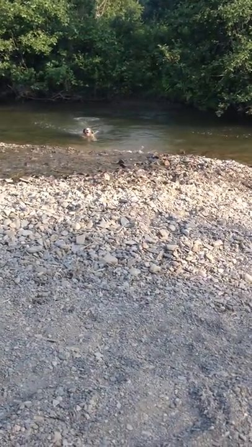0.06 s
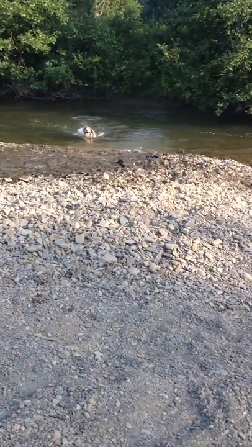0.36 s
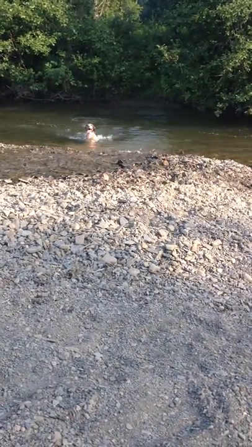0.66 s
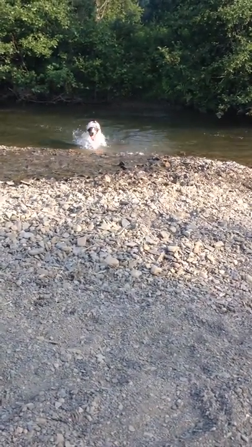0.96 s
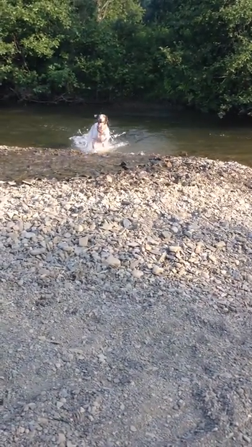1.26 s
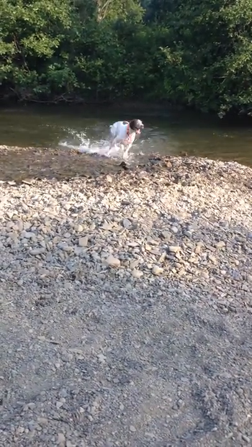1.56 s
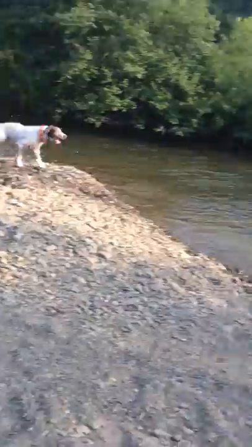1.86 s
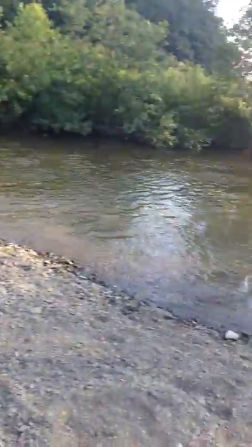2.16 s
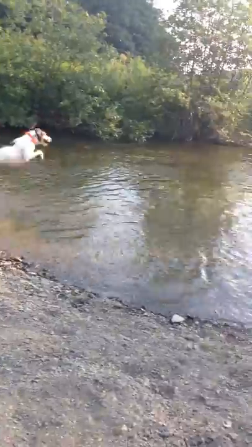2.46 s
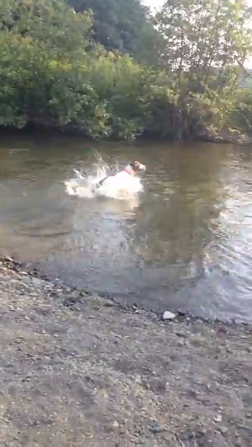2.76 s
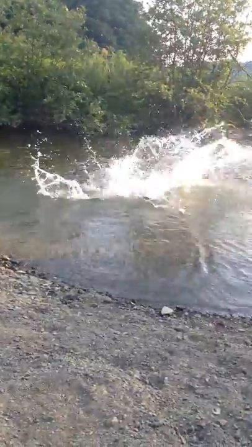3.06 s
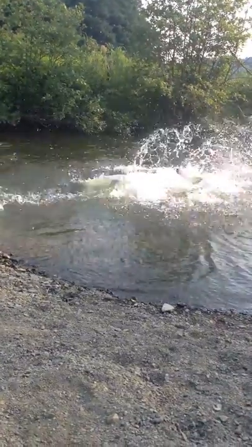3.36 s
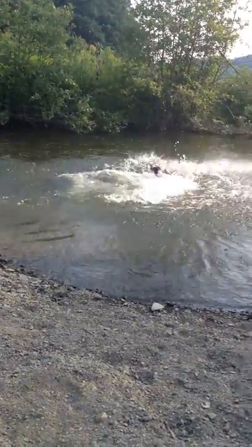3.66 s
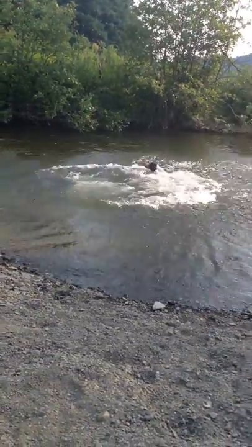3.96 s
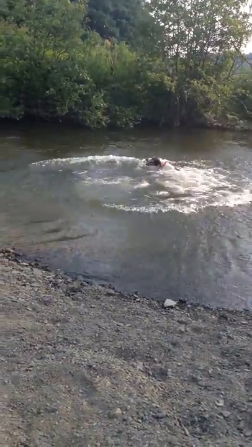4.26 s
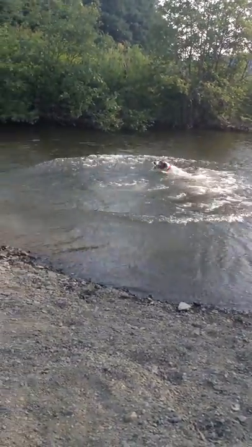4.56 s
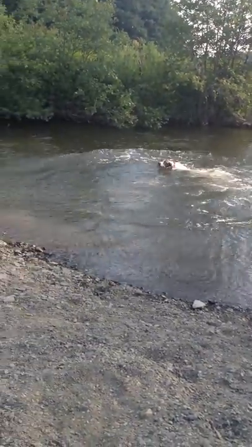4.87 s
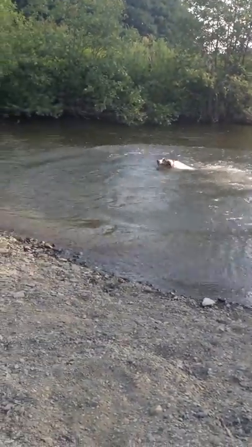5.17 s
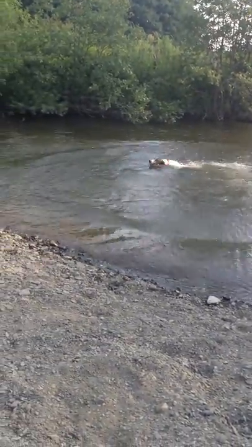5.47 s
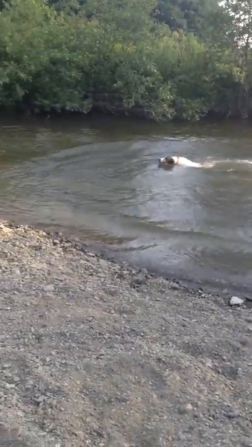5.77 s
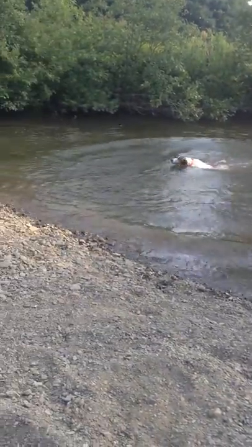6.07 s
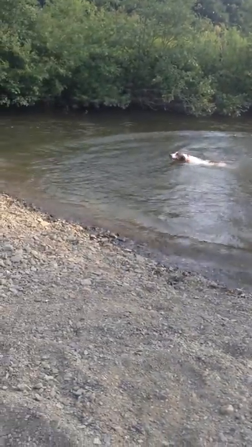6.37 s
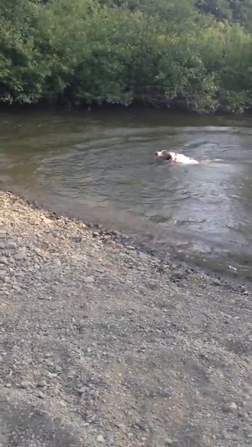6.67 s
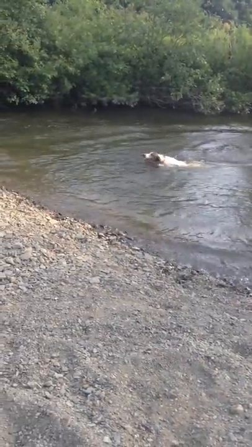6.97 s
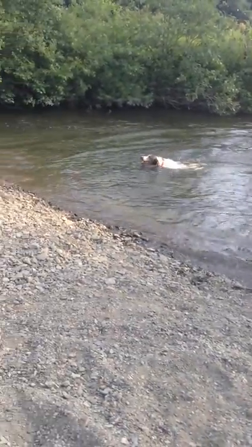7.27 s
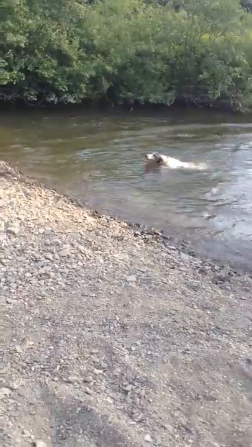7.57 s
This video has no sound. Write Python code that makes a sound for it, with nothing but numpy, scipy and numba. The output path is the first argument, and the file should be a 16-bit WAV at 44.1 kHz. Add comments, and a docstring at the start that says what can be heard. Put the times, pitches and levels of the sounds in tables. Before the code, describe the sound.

A dog splashes out of a flowing creek, gallops over pebbles and leaps back in with a big splash, then small waves lap.

```python
"""A creek washes on throughout. Wind nudges the microphone and a small bird calls as a dog wades out,
churning up bubbles, its coat dripping. It gallops over a gravel bar: paws slap, pebbles knock.
At 2.7 s it leaps back in: a smack, deep gulps from the collapsing air cavity, then spray raining down.
It paddles off through fading foam. From 5 s its waves lap the shore and hiss back through the shingle,
among a few more knocks, bird notes and faint puffs of wind."""
import sys
import numpy as np
from scipy import signal
from scipy.fft import rfft, irfft, next_fast_len
from scipy.io import wavfile
from numba import njit

SR = 44100
rng = np.random.default_rng(int(sys.argv[2]) if len(sys.argv) > 2 else 0)


def wrap_up_sound(samples):
    """Save the sound to the file named by the first command line argument, as 16-bit audio."""
    columns = np.atleast_2d(samples).T
    # keep every value between -1 and 1, then stretch to whole-number steps
    tamed = np.clip(columns, -1, 1)
    steps = np.round(tamed * 32767).astype(np.int16)
    wavfile.write(sys.argv[1], SR, steps)


N = 345303
T = np.arange(N) / SR


def undb(db):
    """Decibels to gain."""
    return 10 ** (np.asarray(db) / 20)


def unit(x):
    """Scale to rms 1."""
    return x / np.sqrt(np.mean(x ** 2))


def colour(x, points):
    """Filter by a curve of (Hz, dB) points, then scale to rms 1."""
    hz, db = np.transpose(points)
    size = next_fast_len(N)
    bin_hz = np.maximum(np.fft.rfftfreq(size, 1 / SR), 1)
    response = undb(np.interp(np.log(bin_hz), np.log(hz), db))
    return unit(irfft(rfft(x, size) * response, size)[:N])


def highpass(x, hz):
    """Second-order bass cut."""
    return signal.sosfilt(signal.butter(2, hz, "high", fs=SR, output="sos"), x)


def wander(rate_hz):
    """Random curve, spread near 1; holds after 1024 steps."""
    steps = rng.standard_normal(1024)
    return np.interp(T * rate_hz, np.arange(len(steps)), steps)


def decay(t, t60_s):
    """Gain falling 60 dB in t60_s."""
    return np.exp(-np.log(1000) * t / t60_s)


def swell(start_s, attack_s, hold_s, t60_s):
    """Gain that rises, holds, then dies away."""
    age = T - start_s
    fade_db = -60 * np.clip((age - attack_s - hold_s) / t60_s, 0, 2)
    return np.clip(age / attack_s, 0, 1) * undb(fade_db)


def bump(centre_s, half_width_s):
    """Bell-shaped gain."""
    return np.exp(-((T - centre_s) / half_width_s) ** 2)


def power_sum(*gains):
    """Joint gain of unrelated sounds."""
    return np.sqrt(sum(g ** 2 for g in gains))


def add(out, start_s, sound):
    """Mix a short sound into out."""
    i = max(int(start_s * SR), 0)
    out[i:i + len(sound)] += sound[:N - i]


@njit
def ring(starts, hz, cycles, size, glide):
    """Sum of decaying sines, each rising in pitch by the fraction glide as it dies."""
    out = np.zeros(N)
    for k in range(len(starts)):
        n = int(cycles[k] * SR / hz[k]) + 2
        phase, gain, fade = 0., size[k], np.exp(-5.5 / n)
        for i in range(min(n, N - starts[k])):
            phase += 2 * np.pi * hz[k] / SR * (1 + glide * i / n)
            out[starts[k] + i] += gain * np.sin(phase)
            gain *= fade
    return out


def bubbles(count, low_hz, high_hz, cycles, spread_db, glide):
    """Bubbles of random strength ring at random moments; flat spectrum between the two pitches."""
    when, pitch, life, luck = rng.random((count, 4)).T
    hz = low_hz * (high_hz / low_hz) ** pitch
    size = hz * undb(-spread_db * np.log(np.maximum(luck, .01)))
    return unit(ring((when * N).astype(np.int64), hz, cycles * (.5 + life), size, glide))


def drops(count, spread_db):
    """Sharp ticks of drops striking the surface."""
    when, sign, luck = rng.random((count, 3)).T
    size = np.sign(sign - .5) * undb(-spread_db * np.log(np.maximum(luck, .003)))
    return unit(np.bincount((when * N).astype(int), size, N))


# Flowing water. Each row: frequency in Hz, relative level in dB.
CREEK_SPECTRUM = [(24, -57), (40, -23), (103, -7.5), (173, -2.5), (239, 0), (364, -2.5), (466, -11.5),
                  (582, -2.5), (824, -0.5), (888, -2), (1170, 0), (1260, 0), (1780, -3), (3140, -10),
                  (15000, -13)]
# Drops on water, also for the dog's spray. Each row: frequency in Hz, relative level in dB.
DROP_SPECTRUM = [(900, -35), (2000, -2.5), (3300, -3), (5000, -2), (8000, -2), (11000, -1.5), (15000, 0)]


def creek(wash_db=-49, tick_db=-65):
    """A smooth distant wash, with near ripples that gurgle, fizz and tick."""
    gurgle = bubbles(count=3600, low_hz=285, high_hz=1966, cycles=26, spread_db=2.5, glide=0.22)
    fizz = bubbles(count=5000, low_hz=2500, high_hz=14550, cycles=25, spread_db=3, glide=0.14)
    wash = rng.standard_normal(N)
    ripple_db = np.clip(4.8 * wander(8), -5, 4)
    flow = wash + undb(-12 + ripple_db) * gurgle + undb(-3.5) * fizz
    ticks = undb(tick_db) * colour(drops(count=260, spread_db=-1), DROP_SPECTRUM)
    return colour(flow, CREEK_SPECTRUM) * undb(wash_db + .5 * wander(2.37)) + ticks


# Wind eddies. Each row: centre in seconds, level in dB, half width in seconds.
EDDIES = [(0.019, -38.5, 0.028), (0.111, -36.5, 0.011), (.305, -39.5, 0.05), (.468, -32, 0.023),
          (0.616, -27.5, 0.014), (0.651, -27.5, 0.021), (.745, -38, 0.065), (1.24, -39, 0.065),
          (1.305, -36, 0.035), (1.4, -39, 0.014), (1.67, -46, 0.056), (1.81, -43.5, 0.018),
          (2.235, -40.5, .014), (4.34, -60, 0.027), (5.82, -53, .025), (6.02, -54, 0.02),
          (6.67, -57, 0.022), (7.49, -50.5, .025), (7.61, -60, 0.028)]
# Microphone buffeting. Each row: frequency in Hz, relative level in dB.
WIND_SPECTRUM = [(25, -30), (55, -19), (90, -9), (140, 4), (230, -1), (310, -7), (430, -22.5), (900, -26.5),
                 (3000, -65)]


def wind(breeze_db=-47.5):
    """Eddies thump softly on the microphone port, the early ones over a light breeze."""
    eddies = [undb(db) * bump(centre_s, half_width_s) for centre_s, db, half_width_s in EDDIES]
    breeze = undb(breeze_db + 3.6 * wander(22)) * swell(0.55, attack_s=0.1, hold_s=1.03, t60_s=1.9)
    rumble = colour(rng.standard_normal(N), WIND_SPECTRUM)
    return rumble * power_sum(breeze, *eddies) * undb(0.32 * wander(40))


def bushes(x, t60_s=0.27):
    """Bushes on the far bank scatter a sound into a short, soft tail."""
    t = T[:SR // 3]
    leaves = rng.standard_normal(len(t)) * decay(t, t60_s)
    return signal.fftconvolve(x, leaves / np.linalg.norm(leaves))[:N]


# Bird notes. Each row: start and length in seconds, level in dB, first, middle and last pitch in Hz.
BIRD_NOTES = [(.175, .059, -43, 3870, 3410, 3310), (.292, .019, -48, 3500, 3670, 3800),
              (.53, 0.3, -54.5, 4980, 4950, 4930), (5.258, 0.09, -36, 3300, 3096, 3280),
              (7.29, 0.044, -42, 3320, 3060, 3070)]
# A far bird's high pip. One row: length in seconds, level in dB, first, middle and last pitch in Hz.
FAR_PIP = (.028, -55.5, 5450, 5310, 5230)


def birds(far_db=-48, tremble_db=3, scatter_db=-10, pip_start_s=.031, pip_period_s=.1):
    """Thin gliding whistles; the fainter a note, the further off, so the more it trembles and scatters."""
    direct, scattered = np.zeros(N), np.zeros(N)
    waver, tremble = 1 + 0.013 * wander(260), wander(90)
    pips = [(pip_start_s + k * pip_period_s, *FAR_PIP) for k in range(4)]
    for start_s, length_s, db, *hz in [*BIRD_NOTES, *pips]:
        progress = np.linspace(0, 1, int(length_s * SR))
        span = slice(int(start_s * SR), int(start_s * SR) + len(progress))
        farness = min(undb(far_db - db), 1)
        pitch_hz = np.polyval(np.polyfit([0, .5, 1], hz, 2), progress) * waver[span]
        shape = np.tanh(2 * np.sin(np.pi * progress)) * undb(tremble_db * farness * tremble[span])
        note = undb(db) * shape * np.sin(2 * np.pi * np.cumsum(pitch_hz) / SR)
        add(direct, start_s, note)
        add(scattered, start_s, farness ** 2 * note)
    return direct + undb(scatter_db) * bushes(scattered)


# The dog's waves. Each row: start in seconds, level in dB, attack and hold in seconds.
SHORE_WAVES = [(5.053, -58, 0.032, 0.032), (5.73, -53.5, 0.037, 0.15), (6.497, -36.5, 0.005, 0.016),
               (6.55, -45.5, 0.0092, 0.085), (6.763, -46, 0.14, 0.092), (6.985, -39.5, 0.017, 0.055),
               (7.085, -44, .02, 0.048), (7.144, -43.5, 0.013, 0.035), (7.599, -40, 0.038, 0.017),
               (7.688, -46.5, .03, 0.093)]
# A wave breaking, and draining. Each row: frequency in Hz, relative level in dB.
BREAK_SPECTRUM = [(100, -21), (200, -4), (300, 6), (430, -1.5), (600, 1.5), (1300, 3), (2400, -2),
                  (3600, -5), (5200, -10.5), (9000, -8), (15000, -6)]
DRAIN_SPECTRUM = [(1500, -20), (2700, -5), (3700, -2), (4700, -8.5), (6500, -8), (10000, -13.5),
                  (15000, -8)]


def shore(gurgle_db=-5, drain_db=-6, drain_rise_s=0.056, t60_s=0.36):
    """Waves break on the shingle in froth, ticks and gurgles, then hiss back between the stones."""
    breaking, draining = [], []
    for start_s, db, attack_s, hold_s in SHORE_WAVES:
        breaking.append(undb(db) * swell(start_s, attack_s, hold_s, t60_s))
        draining.append(undb(db) * swell(start_s, drain_rise_s, hold_s, t60_s))
    froth = bubbles(count=9000, low_hz=192, high_hz=6040, cycles=16, spread_db=1.5, glide=0.14)
    rush = unit(froth + undb(5.5) * drops(count=9000, spread_db=-2) + rng.standard_normal(N))
    gurgles = bubbles(count=700, low_hz=213, high_hz=1470, cycles=4.3, spread_db=-1.5, glide=0.34)
    hiss = colour(drops(count=20000, spread_db=2), DRAIN_SPECTRUM) * undb(drain_db)
    lap = unit(colour(rush, BREAK_SPECTRUM) + undb(gurgle_db) * colour(gurgles, BREAK_SPECTRUM))
    return lap * power_sum(*breaking) * undb(0.5 * wander(50)) + hiss * power_sum(*draining)


# Pebble hits. Each row: start in seconds, level in dB, lowest mode in Hz, t60 in seconds.
PEBBLE_HITS = [(1.418, -30, 1880, 0.017), (1.752, -28, 790, .015), (1.86, -24.5, 3230, 0.021),
               (1.916, -22, 1930, 0.02), (1.9405, -21, 11400, 0.021), (2.783, -12.5, 1720, 0.017),
               (5.186, -30.5, 3370, 0.015), (5.6701, -18.5, 980, 0.014), (6.271, -29.5, 1315, 0.035),
               (6.308, -30, 1090, 0.038)]
# Pebble modes. Each row: multiple of the lowest mode, relative level in dB.
PEBBLE_MODES = [(1, 12), (1.17, 3.5), (1.56, 0), (2.4, -7.5), (4.3, -11.5)]


def pebbles(crack_db=-16, crack_s=0.00037, scatter_db=-22, scatter_s=0.017):
    """Pebbles knock: a tiny crack, quickly damped modes and a faint scatter off the stones around."""
    out, t = np.zeros(N), T[:SR // 10]
    for start_s, db, hz, t60_s in PEBBLE_HITS:
        noise, stones = rng.standard_normal((2, len(t)))
        modes = sum(undb(mode_db) * np.sin(2 * np.pi * hz * ratio * t)
                    for ratio, mode_db in PEBBLE_MODES if hz * ratio < SR / 2)
        cut_hz = min(hz, SR / 4)  # a small stone radiates little below its lowest mode
        body = highpass(modes * decay(t, t60_s), cut_hz)
        tail = signal.fftconvolve(body, stones * np.exp(-t / scatter_s))[:len(t)]
        knock = body / np.abs(body).max() + undb(scatter_db) * tail / np.abs(tail).max()
        crack = undb(crack_db) * highpass(noise * np.exp(-t / crack_s), cut_hz)
        add(out, start_s, undb(db) * (knock + crack))
    return out


# Large bubbles. Each row: start in seconds, level in dB, pitch in Hz, t60 in seconds, rise in octaves/s.
LARGE_BUBBLES = [(.062, -28, 396, 0.022, 2), (.932, -36.5, 520, 0.12, 0.91), (2.321, -18, 690, 0.021, 2),
                 (2.8, -11.5, 258, .03, 1), (2.918, -25.5, 550, .12, 2.8), (3.05, -27, 148, 0.15, 1),
                 (3.13, -21, 210, 0.095, 2.4), (3.944, -29, 1240, .05, 2), (5.822, -42, 525, 0.47, 16),
                 (6.52, -27, 300, 0.048, 2.2), (6.805, -39, 630, 0.078, 3), (6.885, -39, 300, .08, 2),
                 (6.915, -38, 510, 0.055, 3), (6.94, -35, 820, .04, 3), (7.012, -31.5, 3900, 0.042, 1),
                 (7.12, -25, 1150, 0.023, 5), (7.639, -32, 1730, 0.077, 1.2)]


def plops():
    """A large bubble rings and climbs in pitch, an octave at most, as it nears the surface."""
    out, t = np.zeros(N), T[:SR // 6]
    for start_s, db, hz, t60_s, rise in LARGE_BUBBLES:
        octaves = np.clip(rise * t, 0, 1)
        phase = 2 * np.pi * np.cumsum(hz * 2 ** octaves) / SR
        shape = (1 - np.exp(-2 * hz * t)) * decay(t, t60_s) * (1 - octaves ** 2)
        add(out, start_s, undb(db) * np.sin(phase) * shape)
    return highpass(out, 120)


# Paws and body hit water and wet gravel.
# Each row: start in seconds, level in dB, t60 in seconds, ring pitch in Hz, relative ring level in dB.
WET_IMPACTS = [(1.508, -37, 0.021, 2230, 9), (1.671, -25.5, .011, 4200, -7), (1.692, -29, 0.019, 7000, -21),
               (2.015, -24.5, 0.053, 7000, -13), (2.093, -28, 0.048, 1500, -16),
               (2.166, -25, 0.011, 10500, -3), (2.253, -28, 0.017, 8000, -6),
               (2.283, -23.5, 0.022, 313, 4.5), (2.304, -28.5, 0.082, 790, -10),
               (2.678, -19, 0.027, 1700, -14), (2.687, -23, 0.035, 700, -18), (2.752, -8.5, 0.013, 710, -3),
               (2.765, -27.5, 0.064, 1240, 0), (2.7819, -12, .012, 3280, 0.5)]


def slaps(rise_s=0.00051, hollow_q=5, spike_s=.00006, snappy_t60_s=0.034):
    """A pressure spike, weaker in slow slaps, and a broad burst that rings the hollow the slap opens."""
    out, t = np.zeros(N), T[:SR // 4]
    age = np.maximum(t - rise_s, 0) / spike_s
    spike = age * np.exp(1 - age) * np.cos(age)
    for start_s, db, t60_s, hz, ring_db in WET_IMPACTS:
        burst = rng.standard_normal(len(t))
        hollow = unit(signal.lfilter(*signal.iirpeak(hz, hollow_q, SR), burst))
        shape = (1 - np.exp(-t / rise_s)) * decay(t, t60_s)
        snap = min(snappy_t60_s / t60_s, 1) * spike
        add(out, start_s, undb(db) * (snap + shape * (burst + undb(ring_db) * hollow)))
    return highpass(out, 200)


# Strokes and bounds. Each row: start and length in seconds, churn and spray gain in dB.
DOG_STROKES = [(0.0, 0.058, -46.5, -67), (0.215, .12, -53, -73), (0.353, 0.064, -47.5, -61),
               (0.423, 0.049, -46, -52.5), (0.824, 0.15, -45, -66), (1.008, 0.12, -43, -60),
               (1.171, 0.15, -45.5, -45.5), (1.348, 0.22, -47.5, -52.5), (1.642, 0.049, -47.5, -44),
               (1.707, 0.03, -43, -68), (1.806, 0.14, -51.5, -49.5), (1.998, .11, -53, -42),
               (2.2, 0.021, -48.5, -48), (2.26, 0.064, -50, -41), (2.697, 0.059, -52, -38.5),
               (3.922, 0.054, -46, -57), (4.413, .07, -48, -70)]


def wading_gains(drip_churn_db=-54.5, drip_spray_db=-49.5, attack_share=0.14):
    """Churn and spray gains: each stroke shoves water aside; the coat streams until the leap."""
    drip = swell(0.38, attack_s=0.59, hold_s=1.8, t60_s=0.59)
    churn, spray = [undb(drip_churn_db) * drip], [undb(drip_spray_db) * drip]
    for start_s, length_s, churn_db, spray_db in DOG_STROKES:
        attack_s = attack_share * length_s
        shove = swell(start_s, attack_s, length_s - attack_s, t60_s=0.29)
        churn.append(undb(churn_db) * shove)
        spray.append(undb(spray_db) * shove)
    return power_sum(*churn), power_sum(*spray)


# The leap's air cavity pinches off in gulps. Each row: centre in seconds, level in dB.
PINCH_OFFS = [(2.795, -31.5), (2.885, -31), (2.932, -33.5), (3.015, -37), (3.08, -38), (3.144, -30.5)]


def plunge_gains(start_s=2.744, contact_s=0.0094, flight_s=0.76, early_s=0.46, late_s=0.33):
    """Churn, spray and gulp gains of the leap: smack, collapsing cavity, water raining back, foam."""
    smack = undb(-30.5) * swell(start_s, contact_s, hold_s=0.039, t60_s=0.21)
    cavity = undb(-35.5) * swell(start_s, attack_s=0.025, hold_s=.25, t60_s=3)
    foam = swell(start_s, contact_s, hold_s=0, t60_s=8.6)
    lag_s = T - start_s - flight_s  # zero when the thrown water lands thickest
    rain = (T > start_s) * np.exp(-(lag_s / np.where(lag_s < 0, early_s, late_s)) ** 2)
    churn = power_sum(smack, undb(-37.5) * foam, undb(-37.5) * rain)
    spray = power_sum(smack, undb(-42) * foam, undb(-33.5) * rain)
    pinches = [undb(db) * bump(centre_s, half_width_s=0.021) for centre_s, db in PINCH_OFFS]
    return churn, spray, power_sum(cavity, *pinches, undb(-12.5) * churn)


def droplet_fizz(spray_gain):
    """Drops tick and tinkle; the more spray is in the air, the more they merge into hiss."""
    hiss_share = np.clip(spray_gain / undb(-31), .25, .85)
    tinkle = bubbles(count=9000, low_hz=2520, high_hz=13840, cycles=60, spread_db=6, glide=.1)
    ticks = unit(drops(count=16000, spread_db=2) + undb(-10.5) * tinkle)
    return np.sqrt(1 - hiss_share) * ticks + np.sqrt(hiss_share) * rng.standard_normal(N)


# Churned water. Each row: frequency in Hz, relative level in dB.
CHURN_SPECTRUM = [(250, -29), (450, 0), (700, -1), (1200, 3), (1800, -2), (2600, -5.5), (3500, -4.5),
                  (5000, -13.5), (9000, -6)]


def churning():
    """Froth rings, over noise for the bubbles too many to tell apart."""
    froth = bubbles(count=14000, low_hz=365, high_hz=5800, cycles=16, spread_db=2, glide=0.26)
    return colour(froth + rng.standard_normal(N), CHURN_SPECTRUM) * undb(0.5 + wander(30))


# Deep air pockets. Each row: frequency in Hz, relative level in dB.
GULP_SPECTRUM = [(50, -26), (100, -16), (150, -7.5), (240, 1), (350, 1.5), (560, -11.5), (800, -3),
                 (1500, -56)]


def gulping():
    """Air dragged under by the body rings in deep notes."""
    pockets = bubbles(count=5000, low_hz=94, high_hz=897, cycles=11.7, spread_db=-1, glide=0.36)
    return colour(pockets, GULP_SPECTRUM)


# Swish and slosh of wading. Each row: frequency in Hz, relative level in dB.
SWISH_SPECTRUM = [(1200, -23), (2000, -7.5), (2900, 1), (3800, -8), (5000, -18), (9000, -11), (15000, -9)]
SLOSH_SPECTRUM = [(300, -21), (430, -4), (520, 7), (640, -6), (900, -13), (1200, -30)]


def wading(fizz, churn_gain, spray_gain, swish_db=-6.5, splat_db=-4.5, slosh_db=-6.5):
    """A sheet of water swishes ahead, fat drops fly off the legs, hollows gurgle round the chest."""
    swish = colour(fizz, SWISH_SPECTRUM) * undb(swish_db)
    splats = colour(drops(count=1100, spread_db=3), DROP_SPECTRUM) * undb(splat_db)
    hollows = bubbles(count=1500, low_hz=379, high_hz=965, cycles=16, spread_db=3.5, glide=0.19)
    slosh = colour(hollows, SLOSH_SPECTRUM) * undb(slosh_db)
    return (swish + slosh) * churn_gain + splats * spray_gain


def dog_splashes():
    """Strokes and leap both throw spray and churn the water; the leap adds gulps."""
    wade_churn, wade_spray = wading_gains()
    leap_churn, leap_spray, gulp_gain = plunge_gains()
    spray_gain = power_sum(wade_spray, leap_spray)
    fizz = droplet_fizz(spray_gain)
    spray = colour(fizz, DROP_SPECTRUM) * spray_gain * undb(3.5 + wander(45))
    churn = churning() * power_sum(wade_churn, leap_churn)
    return spray + churn + gulping() * gulp_gain + wading(fizz, wade_churn, wade_spray)


def near_echo(x, delay_s=0.00206, gain=0.47, top_hz=1290):
    """A dull, inverted reflection just behind the direct sound hollows it like a comb."""
    dull = signal.sosfilt(signal.butter(1, top_hz, fs=SR, output="sos"), x)
    return x - gain * np.interp(T - delay_s, T, dull, left=0)


def scene():
    """Everything reaches one microphone on the bank."""
    dog = near_echo(dog_splashes() + slaps()) + plops()
    mono = dog + shore() + pebbles() + birds() + wind() + creek()
    return np.array([mono, mono])


def record(dry, low_hz=62, top_hz=15450):
    """The recorder thins the deep bass and cuts the top."""
    top_cut = signal.ellip(10, .2, 70, top_hz, fs=SR, output="sos")
    return signal.sosfilt(top_cut, highpass(dry, low_hz))


dry = scene()
out = record(dry)
wrap_up_sound(out)
```